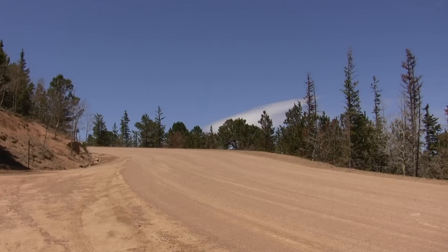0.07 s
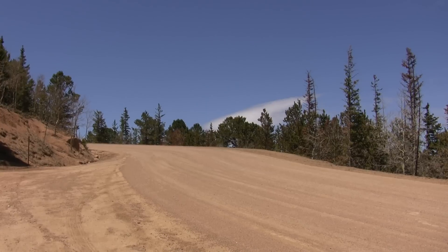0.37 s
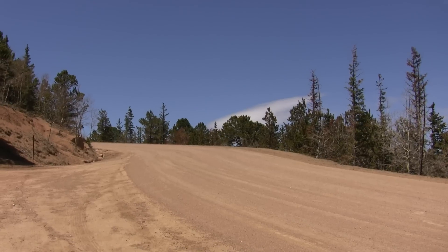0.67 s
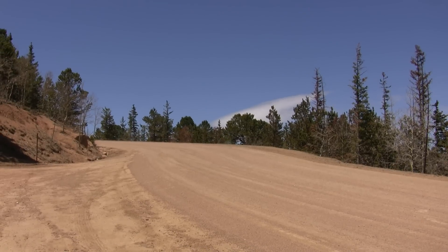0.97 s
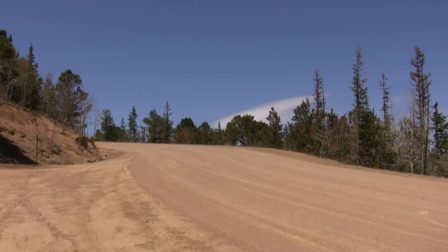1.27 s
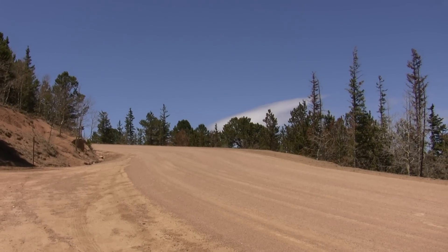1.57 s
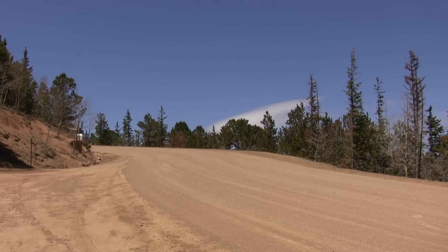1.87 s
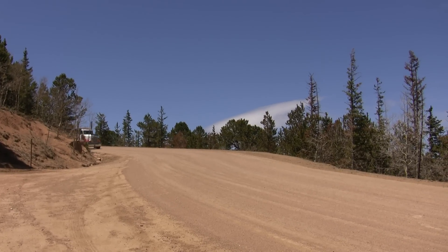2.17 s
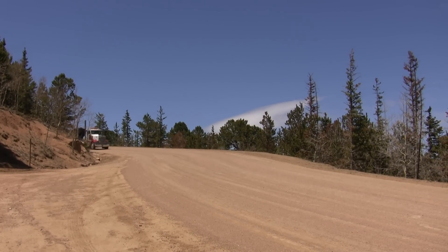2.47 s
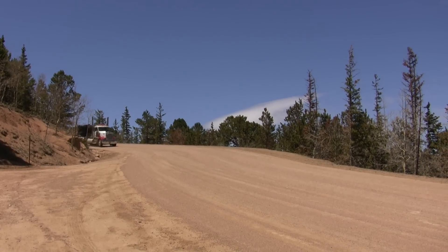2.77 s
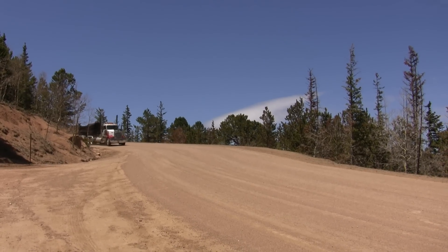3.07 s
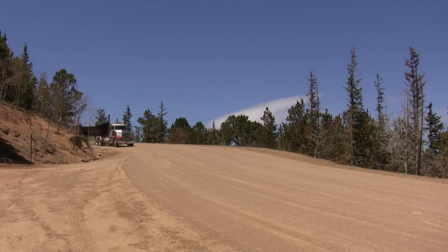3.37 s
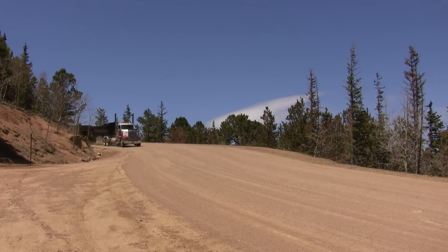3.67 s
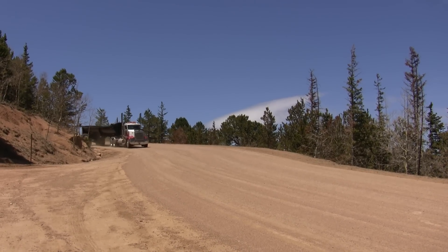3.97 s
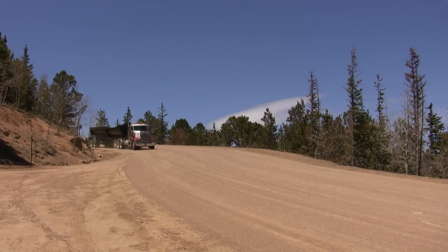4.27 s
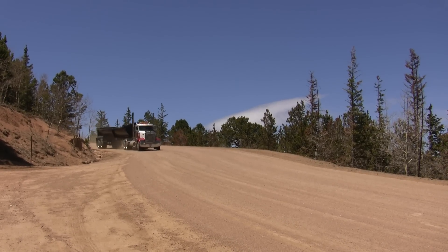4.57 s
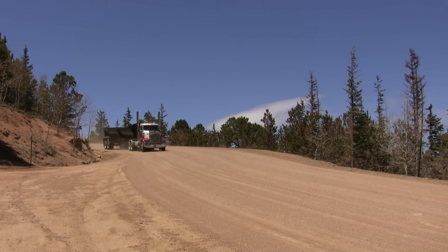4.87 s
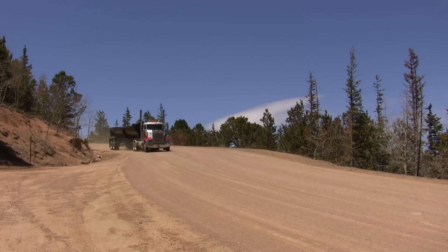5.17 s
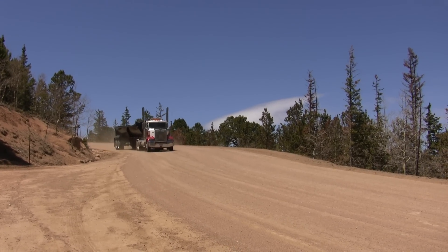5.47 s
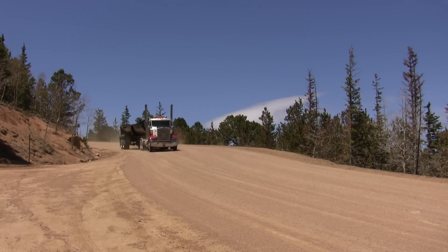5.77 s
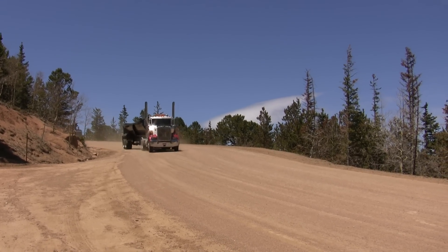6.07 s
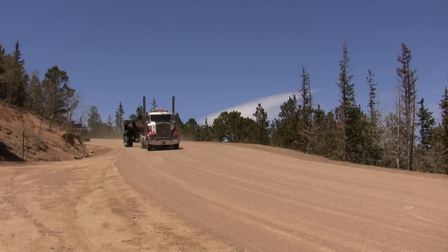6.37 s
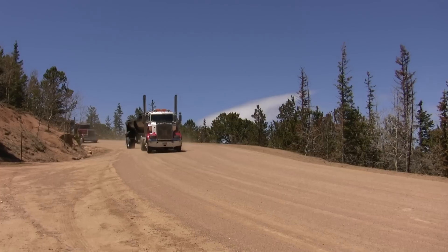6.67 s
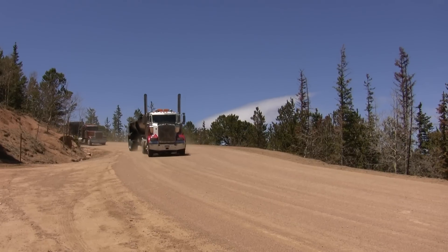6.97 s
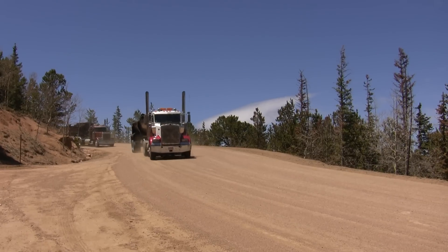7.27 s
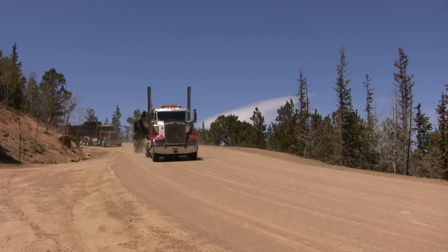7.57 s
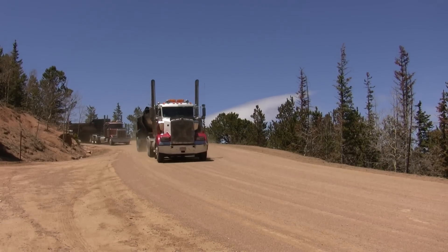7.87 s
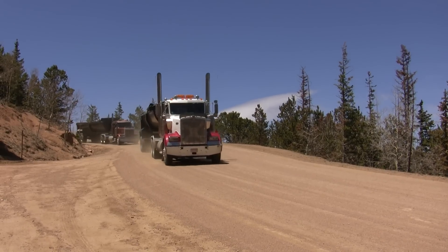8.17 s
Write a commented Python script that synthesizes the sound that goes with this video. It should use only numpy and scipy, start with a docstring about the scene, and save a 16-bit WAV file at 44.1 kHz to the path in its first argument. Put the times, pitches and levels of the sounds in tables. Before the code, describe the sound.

The deep, pulsing drone and exhaust rattle of an engine-braking truck grow louder and brighter as it nears on gravel.

```python
"""A heavy truck's engine brake drones and rattles as it rounds a hillside and comes down a dirt road.
Six cylinders dump compressed air into two tall exhaust stacks: the pipes round the pulses into a deep
drone, while their shock fronts crack, reflect off the tipper body and road, and scatter in the trees.
Tyres rumble and hiss on gravel, a second truck's note beats against the first, and a light gust passes.
The sound grows louder and brighter as the truck nears and leaves the hill's acoustic shadow."""
import sys
import numpy as np
from scipy import signal
from scipy.fft import rfft, irfft
from scipy.io import wavfile
from scipy.ndimage import map_coordinates

SR = 44100
rng = np.random.default_rng(int(sys.argv[2]) if len(sys.argv) > 2 else 0)


def output_pcm(signal):
    """Save a mono or channel-first signal as 16-bit PCM at the path in sys.argv[1].

    Samples are clipped to [-1, 1] before scaling.
    """
    pcm = np.clip(np.atleast_2d(signal).T, -1, 1) * 32767
    wavfile.write(sys.argv[1], SR, np.round(pcm).astype(np.int16))


N = 371322

# one engine cycle of two revolutions, a row per cylinder: (place 0-1, level/dB, front steepness 0-1)
CYLINDERS = [(0.078, 8, 1), (0.241, -5, 0), (0.403, 9, 0.4), (0.5788, 7.5, 0.7), (0.744, -9.5, 0.7),
             (0.9035, 10, 0.67)]
# paths as the truck turns: (t/s, second stack's lag/ms, road bounce's lag/ms, second stack's cracks/dB)
PATHS = [(0, 5.1, 0.21, -18), (1.8, 4.48, 0.15, -10), (2.3, 4.2, 0.17, -2.5), (2.8, 4.18, 0.13, 0),
         (3.2, 3.69, 0.18, -2), (3.9, 3.37, 0.15, -5.5), (4.4, 2.915, 0.28, -12.5), (5.0, 2.245, 0.5, -12),
         (5.5, 1.99, 0.54, -16), (6.1, 1.82, 0.58, -5), (7.0, 1.66, 0.58, -6), (7.8, 1.588, 0.66, -3),
         (8.42, 1.95, 0.89, -5.5)]
ROAD_BOUNCE_DB, FOREST_T60_S = -8, 0.45


def from_db(db):
    """Amplitude ratio of a level in decibels."""
    return 10 ** (np.asarray(db) / 20)


def rms_one(x):
    """Normalisation to unit rms."""
    return x / np.sqrt(np.mean(x ** 2) + 1e-20)


def in_time(rows):
    """Linear interpolation of each column of a time table at every sample."""
    s, *columns = np.transpose(rows)
    return [np.interp(np.arange(N) / SR, s, c) for c in columns]


def gate(start, length, edge_s=0.36):
    """Trapezoidal envelope, half open at its start and its end."""
    t = np.arange(N) / SR
    return np.clip(np.minimum(t - start, start + length - t) / edge_s + .5, 0, 1)


def butter(x, hz, kind, order=2, run=signal.sosfilt):
    """Maximally flat low- or high-pass, causal by default."""
    return run(signal.butter(order, hz, kind, fs=SR, output="sos"), x)


def zero_phase(x, hz, kind, order=2):
    """Filtering forwards and backwards cancels the phase shift."""
    return butter(x, hz, kind, order, run=signal.sosfiltfilt)


def drift(hz):
    """Slow random modulation: noise through two low-pass poles, rms 1."""
    step, settle = 40, 2000
    r = np.exp(-2 * np.pi * hz * step / SR)
    slow = signal.lfilter([1], [1, -2 * r, r * r], rng.standard_normal(N // step + settle + 2))[settle:]
    return np.interp(np.arange(N) / step, np.arange(len(slow)), rms_one(slow))


def flutter(hz):
    """Fast random modulation: as a gain it decorrelates a hiss but keeps its rhythm."""
    return rms_one(butter(rng.standard_normal(N), hz, "low"))


def convolve(x, response):
    """Convolution with an impulse response."""
    return signal.oaconvolve(x, response)[:N]


def colour(x, spectrum, modes=(), size=8192):
    """Minimum-phase filter of given slope and resonances: nothing sounds before its cause."""
    hz, db = np.transpose(spectrum)
    grid = np.maximum(np.arange(size // 2 + 1) * SR / size, 1)
    shape_db = np.interp(np.log(grid), np.log(hz), db)
    for centre, width, peak_db in modes:
        shape_db += peak_db / (1 + (2 * (grid - centre) / width) ** 2)
    cepstrum = irfft(np.log(from_db(shape_db)))
    cepstrum[1:size // 2] *= 2
    cepstrum[size // 2 + 1:] = 0
    return convolve(x, irfft(np.exp(rfft(cepstrum))))


def stereo_noise(spectrum, side_db):
    """Partly coherent noise, rms 1: the more side signal, the less alike the channels."""
    mid, side = (colour(white, spectrum) for white in rng.standard_normal((2, N)))
    return rms_one(mid + from_db(side_db) * side * [[1], [-1]])


def delayed(x, ms):
    """Propagation delay along a path of changing length."""
    return map_coordinates(x, [np.arange(N) - ms * SR / 1000], order=3)


def approach(start_m=130.36, m_per_s=10.51, reference_m=40):
    """Uniform motion: the truck's place, as doublings of the reference distance and depth of shadow."""
    # screening by hillside and trees: (t/s, shadow 0-1)
    shadow = [(0, 1), (1.15, 0.84), (1.6, 0.62), (2.15, 0.49), (2.8, 0.25), (3.05, 0.11), (3.7, 0.01),
              (5.5, 0), (6.1, 0.04), (8.42, 0)]
    metres = start_m - m_per_s * np.arange(N) / SR
    return np.log2(metres / reference_m), in_time(shadow)[0]


def arriving_db(place, level_db, doubling_loss_db, shadow_loss_db):
    """Transmission loss: what distance and the acoustic shadow leave of a level."""
    doublings, shadow = place
    return level_db - doubling_loss_db * doublings - shadow_loss_db * shadow


def drone(turns, place, lead_ms=0.032, waver_db=0.1, weak_waver_db=2.0, wander_rad=1.3):
    """Interference: the pipes round the pulses into low harmonics, which add or cancel between stacks."""
    # harmonics the pipes ring with: (multiple of the revolution rate, level/dB,
    # loss per doubling of distance/dB, loss in full shadow/dB, second stack's share 0-1)
    strong_orders = [(3, -27, 6.5, 9, 0.6), (6, -19, 6.5, 17.5, 0.32), (8, -21.5, 10, 13, 0),
                     (9, -36, 1.5, 19, 0.26), (12, -43, 2.5, 40.5, 0.1)]
    # weak harmonics: (multiple of the revolution rate, level/dB relative to the firing note, order 3)
    weak_orders = [(1.5, -27.5), (2, -18.5), (2.5, -17), (3.5, -26.5), (4, -30), (4.5, -19.5), (5, -13.5),
                   (5.5, -18.5), (6.5, -8), (7, -15.5), (7.5, -14.5), (8.5, -25), (9.5, -21.5), (10, -33.5),
                   (10.5, -21)]
    # the strong orders above the firing note dip briefly: (centre t/s, half-width/s, depth/dB)
    dips = [(0.851, 0.21, 5), (6.082, 0.24, 3), (6.8, 1, 3.5)]
    t = np.arange(N) / SR
    stack_ms, road_ms, _ = in_time(PATHS)
    angle = 2 * np.pi * (turns - 2 * CYLINDERS[0][0])
    # the second stack's low orders run slightly ahead of its cracks
    late = angle - np.gradient(angle) * SR * (stack_ms - lead_ms) / 1000
    dip_db = sum(db * np.exp(-((t - s) / width) ** 2) for s, width, db in dips)
    firing_db, *upper_db = (arriving_db(place, *law) for _, *law, _ in strong_orders)
    levels = [firing_db] + [db - dip_db for db in upper_db]
    strong = weak = 0
    for (order, *_, share), db in zip(strong_orders, levels):
        gain = from_db(db + waver_db * np.sqrt(order / len(CYLINDERS)) * drift(3.5))
        strong += gain * (np.cos(order * angle) + share * np.cos(order * late))
    for order, db in weak_orders:
        gain = from_db(db + weak_waver_db * drift(1.0))
        weak += gain * np.cos(order * angle + wander_rad * drift(0.27))
    x = -np.sqrt(2) * (strong + from_db(firing_db) * weak)
    return x + from_db(ROAD_BOUNCE_DB) * delayed(x, road_ms)


def blowdowns(turns, uneven_db=-0.5, front_db=2.5, jitter_s=15e-6, shock_hz=1700,
              jet_db=-1.5, jet_s=0.0046, jet_hz=2200):
    """Nonlinear steepening: strong cylinder pulses become shocks in the pipe; jet noise follows each."""
    cycles = np.arange(int(turns[-1] / 2) + 1)
    pulses, shocks = np.zeros((2, N))
    for phase, level_db, steepness in CYLINDERS:
        timing, strength, front = rng.standard_normal((200, 3))[:len(cycles)].T
        at = (np.searchsorted(turns / 2, cycles + phase) + timing * jitter_s * SR).astype(int)
        heard = (at > 0) & (at < N - 20)
        size = from_db(level_db + uneven_db * strength)
        pulses[at[heard]] = size[heard]
        shocks[at[heard]] = (size * steepness * from_db(front_db * front))[heard]
    fronts = butter(pulses, shock_hz, "low", order=1) + butter(shocks, shock_hz, "high", order=1)
    puff = np.exp(-np.arange(SR // 20) / (jet_s * SR))
    jet = convolve(fronts, puff / np.linalg.norm(puff)) * rng.standard_normal(N)
    return -fronts + from_db(jet_db) * butter(jet, jet_hz, "high")


def second_stack(x, coherent_hz=2400, thump_hz=800, thump_db=-6.0):
    """Partial coherence: the second stack repeats each pulse later, but its jet noise is its own."""
    stack_ms, _, crack_db = in_time(PATHS)
    late = delayed(x, stack_ms)
    pulse = zero_phase(late, coherent_hz, "low")
    thump = zero_phase(late, thump_hz, "low")
    jet = (late - pulse) * flutter(hz=650)
    return from_db(thump_db) * thump + from_db(crack_db) * (pulse - thump + jet)


def reflections(x, body_hz=2000, road_hz=4000):
    """Specular reflection: the tipper body and the road each add a duller, delayed copy."""
    # the body's front wall throws cracks forward once the truck faces the listener: (t/s, lag/ms, level/dB)
    body_echo = [(4.4, 4.45, -26), (5.3, 3.74, -2), (6.5, 5.72, -14), (7.5, 5.7, -15.5), (8.42, 6, -8)]
    body_ms, body_db = in_time(body_echo)
    _, road_ms, _ = in_time(PATHS)
    x = x + from_db(body_db) * delayed(zero_phase(x, body_hz, "low", order=1), body_ms)
    return x + from_db(ROAD_BOUNCE_DB) * delayed(butter(x, road_hz, "low", order=1), road_ms)


def scatter(x):
    """Diffuse scattering: dense reflections from the trees decay exponentially; power is kept."""
    t = np.arange(int(FOREST_T60_S * SR) + 2) / SR
    tail = rng.standard_normal(2 * SR)[:len(t)] * from_db(-60 * t / FOREST_T60_S)
    return convolve(x, tail / np.linalg.norm(tail))


def forest(x, place, open_db=-8.5, shadow_rise_db=8.5, top_hz=7000):
    """Diffuse-to-direct ratio: deep in the shadow more of the sound comes by way of the trees."""
    _, shadow = place
    ratio = from_db(open_db + shadow_rise_db * np.clip(2 * shadow - 1, 0, 1))
    return (x + ratio * butter(scatter(x), top_hz, "low", order=1)) / np.hypot(1, ratio)


def stack_resonance(x, hold_hz=1386, width_hz=490):
    """Resonance and dispersion: the pipe colours each crack and holds back one band as a nasal ring."""
    # spectrum of one exhaust pulse: (f/Hz, level/dB)
    pulse = [(200, 1.5), (300, 6.5), (370, 12), (440, 4.5), (800, -5.5), (1500, -6.5), (2500, -9.5),
             (3200, -18.5), (6300, -31), (11000, -40), (13500, -44), (16000, -55.5)]
    # resonances and notches of the stacks: (f/Hz, width/Hz, gain/dB)
    stack_modes = [(560, 100, 0), (644, 160, 4.5), (774, 22, -2.5), (913, 280, 9.5), (1150, 210, -4.5),
                   (1327, 350, 5.5), (1770, 410, 3), (2984, 37, -13), (4418, 580, 3.5), (8700, 370, 5)]
    r = np.exp(-np.pi * width_hz / SR)
    poles = [1, -2 * r * np.cos(2 * np.pi * hold_hz / SR), r * r]
    return signal.lfilter(poles[::-1], poles, colour(x, pulse, stack_modes))  # all-pass


def rattle(turns, place, low_hz=305, shimmer_db=-0.05, sway_db=-0.74, spit_db=2.5):
    """Frequency-dependent attenuation: the cracks' treble comes through last as the truck approaches."""
    # growl, bark, rasp, snarl, crack, sizzle:
    # (level/dB, loss per doubling of distance/dB, loss in full shadow/dB)
    band_laws = [(-32.5, 4.5, 26.5), (-30, 4, 30), (-28, 11, 21.5), (-37.5, 9.5, 23), (-45, 17, 22),
                 (-50.5, 22.5, 30)]
    edges_hz, centres_hz = (560, 1100, 2050, 3200, 6500), (400, 780, 1500, 2550, 4500, 9500)
    x = blowdowns(turns)
    x = forest(reflections(x + second_stack(x)), place)
    x = rings(stack_resonance(x))
    x = zero_phase(x, low_hz, "high", order=4)  # below the growl the drone takes over
    below = [zero_phase(x, hz, "low", order=4) for hz in edges_hz]
    bands = np.diff([0 * x, *below, x], axis=0)
    shimmer = shimmer_db * drift(9.5)  # moving air, felt most in the high bands
    bands[-1] *= from_db(spit_db * drift(30))  # only some cracks spit at the very top
    out = np.zeros(N)
    for k, (band, hz, law) in enumerate(zip(bands, centres_hz, band_laws)):
        db = arriving_db(place, *law) + flare_db(hz) + k * shimmer + sway_db * drift(1.7)
        out += rms_one(band) * from_db(db)
    return out


def brassy_tones(turns, pipe_ms=0.094):
    """Forced vibration: single orders ring out, in phase with the cylinders and stacks that drive them."""
    # clean tones: (multiple of the revolution rate, start t/s, length/s, level/dB)
    tones = [(11, 0, 1.5, -57), (15, 0.2, 2.6, -57), (20, 0.9, 1.6, -55), (14, 1.4, 1.7, -52),
             (23, 2.4, 0.8, -49), (20, 3.3, 1.2, -39), (23, 3.8, 0.8, -43), (11, 3.9, 1.8, -46),
             (14, 4.3, 3.0, -40), (8, 4.4, 1.4, -40), (20, 5.1, 3.6, -39), (17, 6.2, 2.5, -41),
             (40, 6.4, 2.3, -45), (23, 6.8, 1.9, -44), (29, 7.2, 1.5, -42), (11, 7.4, 1.3, -41)]
    stack_ms, _, _ = in_time(PATHS)
    phases, level_db, _ = np.transpose(CYLINDERS)
    turns_per_ms = np.gradient(turns) * SR / 1000
    out = np.zeros(N)
    for order, start, length, db in tones:
        cylinders = np.sum(from_db(level_db) * np.exp(-2j * np.pi * order * 2 * phases))
        stacks = 1 + .5 * np.exp(-2j * np.pi * order * turns_per_ms * stack_ms)
        angle = 2 * np.pi * order * (turns - pipe_ms * turns_per_ms) + np.angle(cylinders * stacks)
        out -= np.sqrt(2) * from_db(db) * gate(start, length) * np.cos(angle)
    return out


def second_truck():
    """Beats: a following truck's slightly lower firing note makes the drone throb."""
    # its firing note: (t/s, f/Hz)
    pitch = [(0, 87.6), (1.2, 88.0), (2.3, 88.47), (8.42, 88.6)]
    # its strength at the listener: (t/s, level/dB)
    level = [(0, -55.5), (2, -54), (5.5, -41), (6.5, -45), (8.42, -45)]
    cycles = np.cumsum(in_time(pitch)[0]) / SR
    return np.sqrt(2) * from_db(in_time(level)[0]) * np.sin(2 * np.pi * cycles)


def tyres(place):
    """Rolling noise: tyres and running gear give a broadband rumble."""
    # rumble spectrum: (f/Hz, level/dB)
    spectrum = [(20, -16), (45, 0), (80, 6), (130, -0.5), (200, 6.5), (350, -2), (700, 0.5), (1500, -7),
                (3000, -22), (6000, -47), (16000, -63.5)]
    db = arriving_db(place, level_db=-28.5, doubling_loss_db=7.43, shadow_loss_db=16.7)
    return from_db(db) * stereo_noise(spectrum, side_db=-10.0)


def mountain_air(level_db=-78.5):
    """Ambient noise: still air with a faint hiss."""
    # background spectrum: (f/Hz, level/dB)
    spectrum = [(20, 3.5), (200, -1), (1000, -18), (3000, -23), (6000, -28), (9000, -38), (16000, -39.5)]
    return from_db(level_db) * stereo_noise(spectrum, side_db=-13.0)


def flare_db(hz, reach_octaves=0.89):
    """Amplitude modulation by band: the rattle near hz flares quickly, holds and falls back."""
    # flares: (start t/s, length/s, gain/dB, centre f/Hz)
    flares = [(1.483, 0.63, 5.5, 2960), (2.148, 0.31, 8, 3720), (2.945, 0.57, 7.5, 2360),
              (3.137, 0.3, 11, 6550), (3.572, 0.74, 2.5, 1290), (4.099, 1.1, 2.5, 2650),
              (4.101, 0.5, 6, 5800), (4.85, 0.51, 8, 8060), (5.16, 0.35, -2, 1460),
              (5.373, 0.434, 7, 11940), (6.09, 0.52, 4, 9250), (6.74, 0.55, 5, 8000),
              (7.54, 0.56, 2.5, 6300), (8.038, 0.32, 0.5, 850)]
    return sum(db * np.exp(-(np.log2(hz / centre) / reach_octaves) ** 2) * gate(start, length, 0.025)
               for start, length, db, centre in flares)


def rings(x):
    """Resonance and antiresonance: narrow bands of the rattle ring or go hollow as the truck turns."""
    # swells and hollows: (start t/s, length/s, gain/dB, centre f/Hz, width/Hz)
    swells = [(1.507, 2.1, -7, 394, 93), (3.608, 0.58, 4, 705, 110), (4.598, 2.09, -7, 1083, 262),
              (4.767, 0.62, 3.5, 1331, 89), (5.093, 0.59, 5, 1474, 61.3)]
    out = x.copy()
    for start, length, db, hz, width in swells:
        band = signal.lfilter(*signal.iirpeak(hz, hz / width, fs=SR), x)
        out += (from_db(db * gate(start, length)) - 1) * band
    return out


def gravel(place, grains_hz=300, crunch_db=3.5):
    """Air absorption: the hiss and crunch of grit under the tyres carries only at close range."""
    # grit spectrum: (f/Hz, level/dB)
    spectrum = [(1200, -17), (3200, 3.5), (4500, 2), (6300, -16), (9000, -19), (12000, -19), (16000, -25)]
    crunch = from_db(crunch_db * flutter(grains_hz))
    db = arriving_db(place, level_db=-46.5, doubling_loss_db=17, shadow_loss_db=20)
    return from_db(db) * rms_one(crunch * stereo_noise(spectrum, side_db=-6.5))


def gust(centre_s=5.49, half_length_s=0.84, level_db=-39):
    """Turbulent pressure fluctuation: a light gust rumbles on the microphone."""
    # wind spectrum: (f/Hz, level/dB)
    spectrum = [(20, -10), (55, 10.5), (120, 9), (200, -11), (500, -53)]
    swell = np.exp(-((np.arange(N) / SR - centre_s) / half_length_s) ** 4)
    return from_db(level_db) * swell * stereo_noise(spectrum, side_db=12.0)


def scene(drone_db=-3.34, width_db=-4.5, width_hz=3300, spread_db=-24, wobble_s=80e-6):
    """Superposition: the truck is straight ahead; its treble and the forest spread between the channels."""
    # engine speed: (t/s, revolution rate f/Hz)
    engine_speed = [(0.0, 30.962), (0.8, 30.995), (1.4, 30.888), (2.0, 30.932), (2.6, 30.819),
                    (3.2, 30.816), (3.8, 30.854), (4.4, 30.915), (5.0, 30.884), (5.6, 30.777),
                    (6.2, 30.679), (6.8, 30.673), (7.4, 30.637), (8.0, 30.624), (8.42, 30.622)]
    speed, place = in_time(engine_speed)[0], approach()
    turns = np.cumsum(speed) / SR + speed * wobble_s * drift(2.5)  # the beat runs a little early and late
    cracks = rattle(turns, place)
    side = from_db(width_db) * flutter(hz=500) * butter(cracks, width_hz, "high", order=3)
    side += from_db(spread_db) * scatter(cracks)
    background = tyres(place) + mountain_air()
    exhaust = cracks + from_db(drone_db) * drone(turns, place) + brassy_tones(turns)
    return exhaust + side * [[1], [-1]] + second_truck() + background + gravel(place) + gust()


def record(dry, balance_db=0.42, cutoff_hz=15600):
    """Band limiting: a steep low-pass cuts the top; the right channel is slightly louder."""
    top_cut = signal.ellip(14, .1, 90, cutoff_hz, fs=SR, output="sos")
    return signal.sosfilt(top_cut, dry * from_db([[-balance_db], [balance_db]]))


dry = scene()
out = record(dry)
output_pcm(out)
```